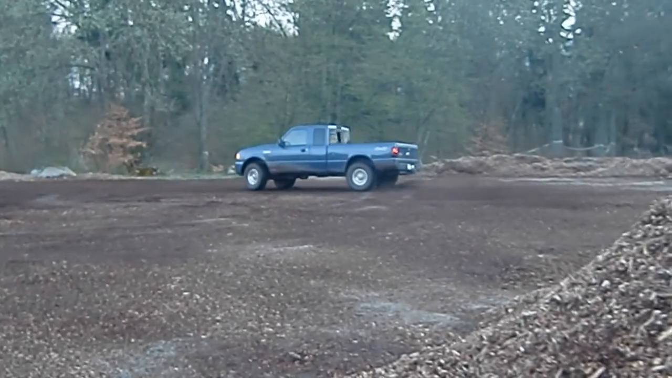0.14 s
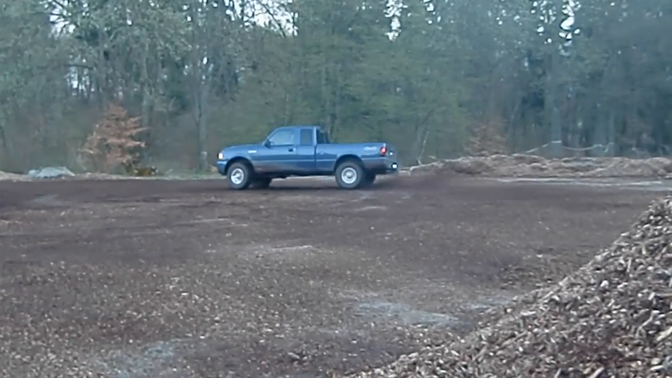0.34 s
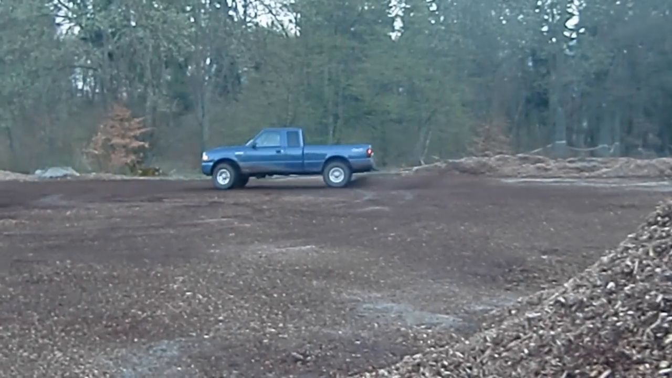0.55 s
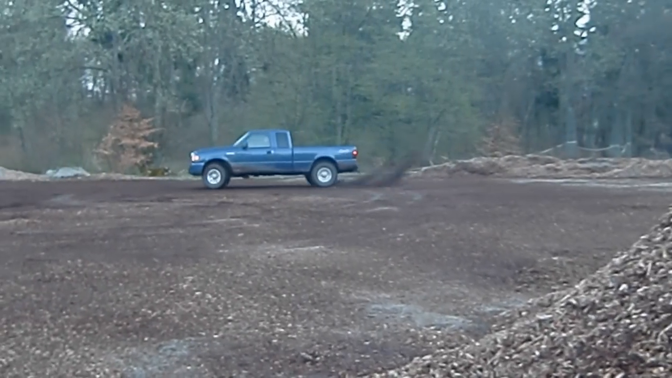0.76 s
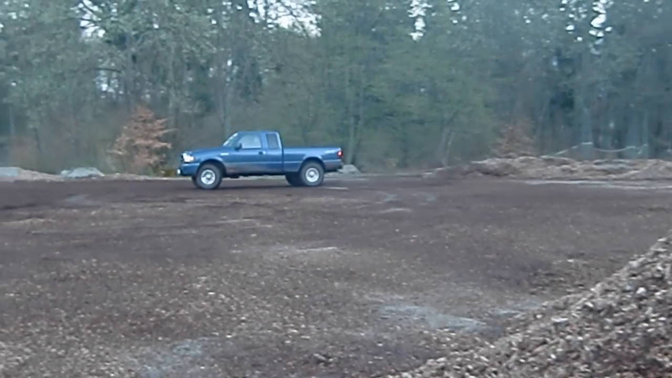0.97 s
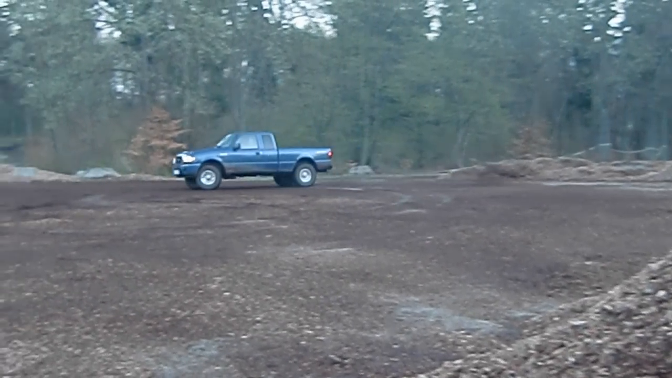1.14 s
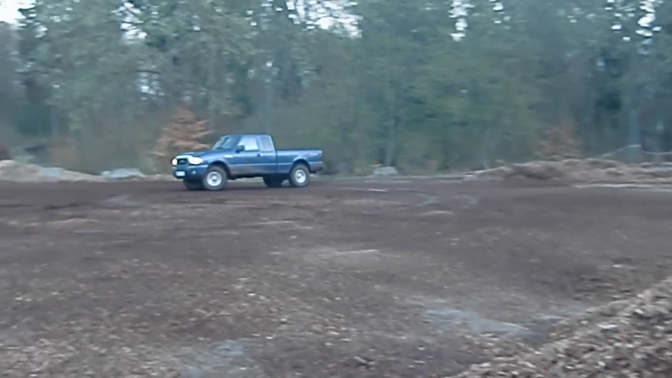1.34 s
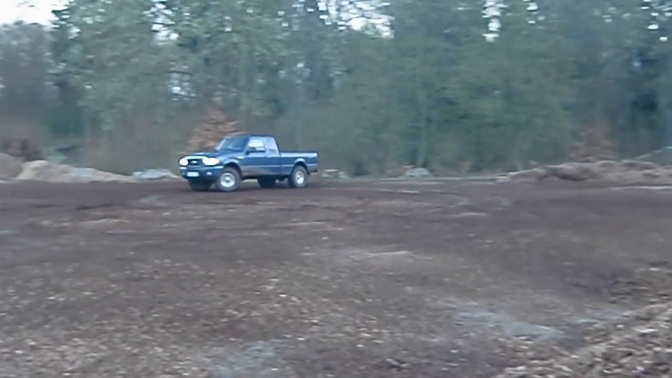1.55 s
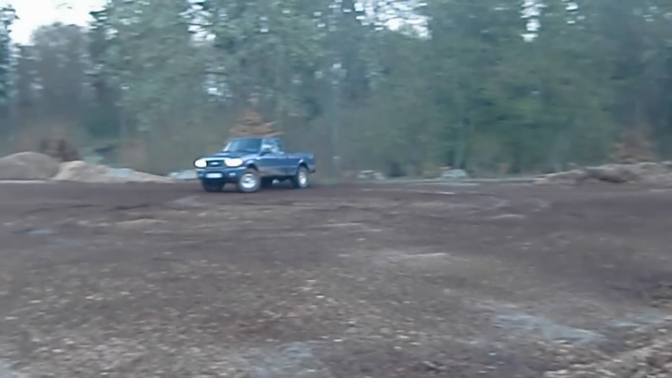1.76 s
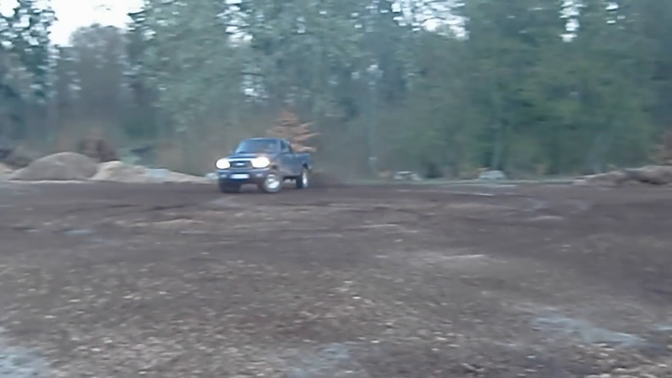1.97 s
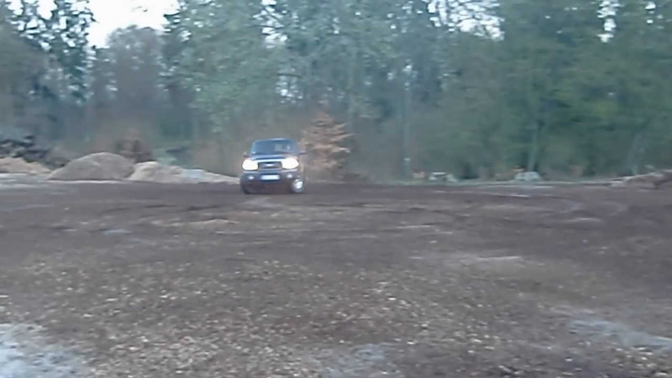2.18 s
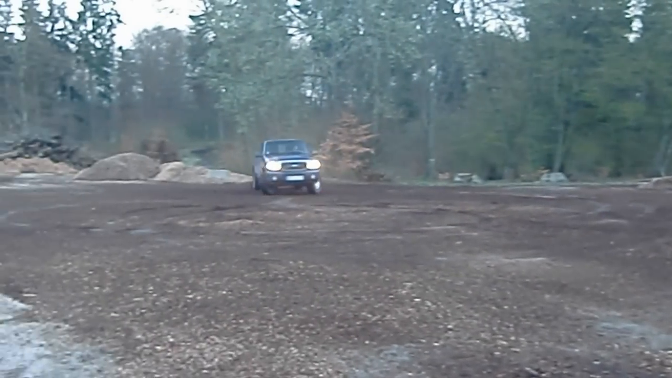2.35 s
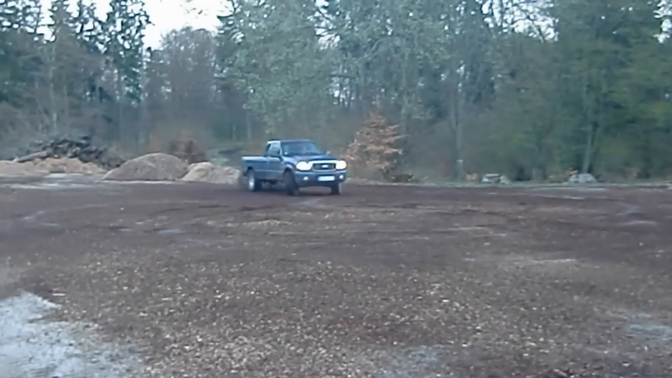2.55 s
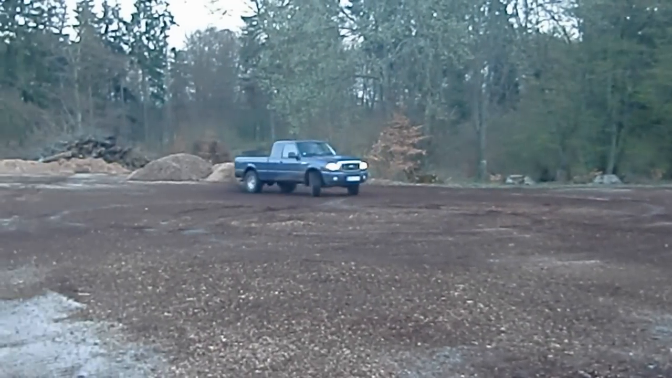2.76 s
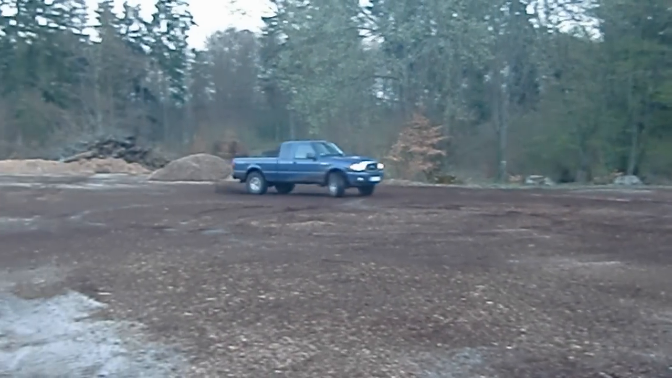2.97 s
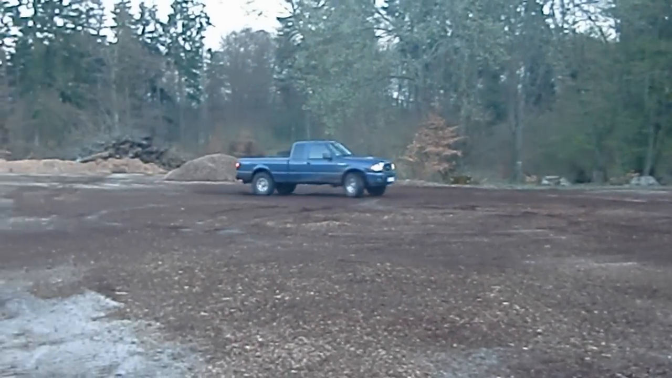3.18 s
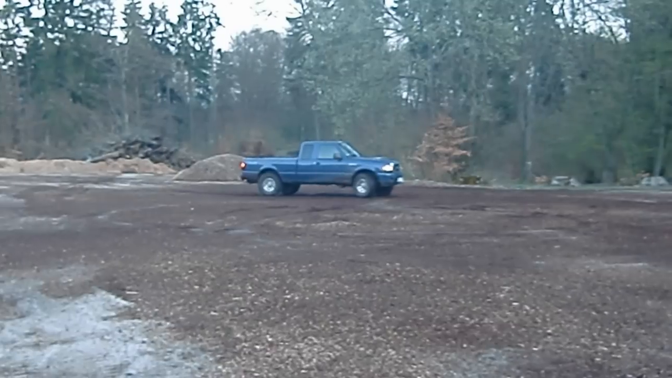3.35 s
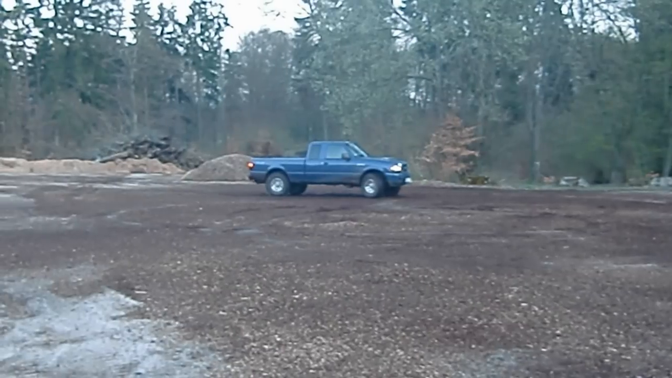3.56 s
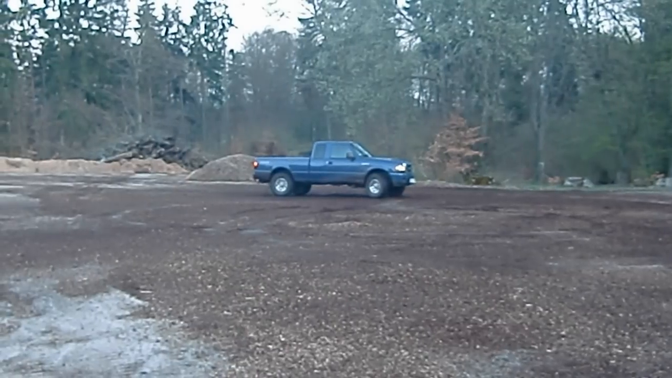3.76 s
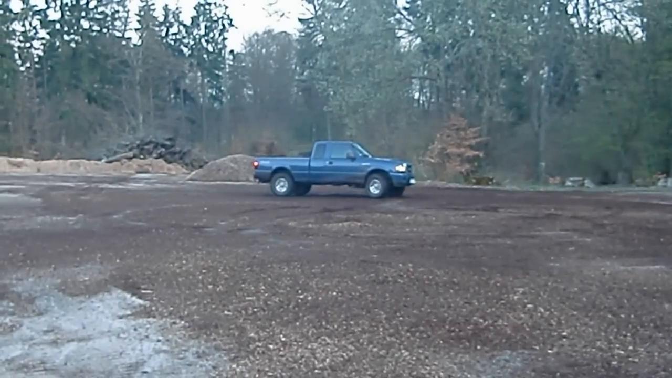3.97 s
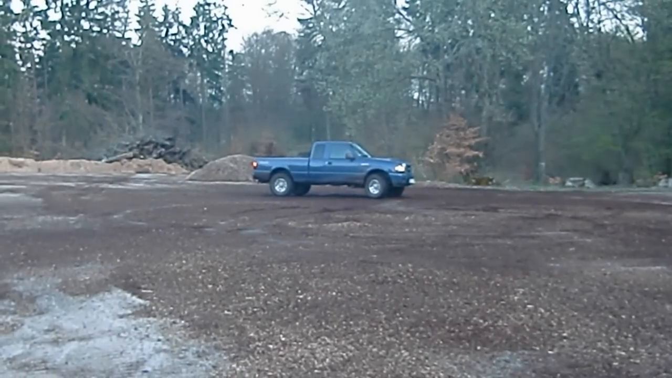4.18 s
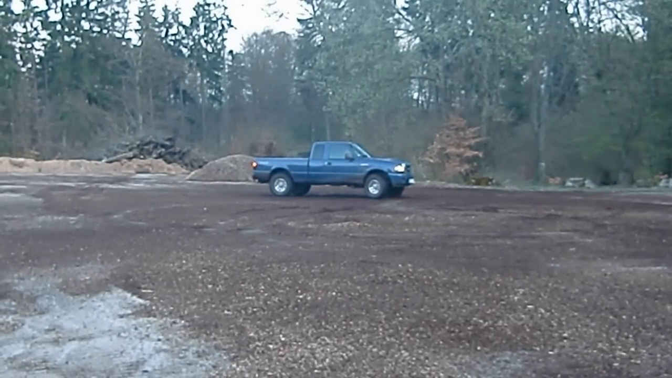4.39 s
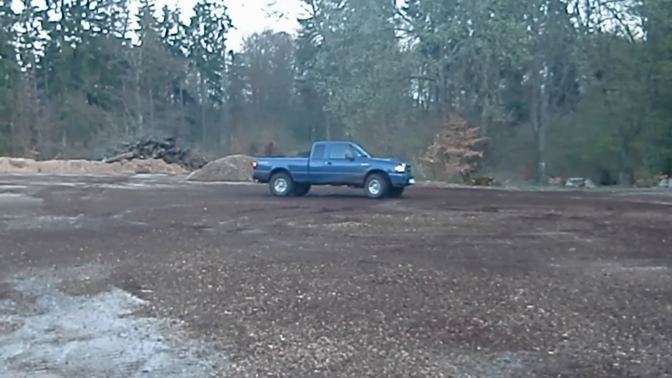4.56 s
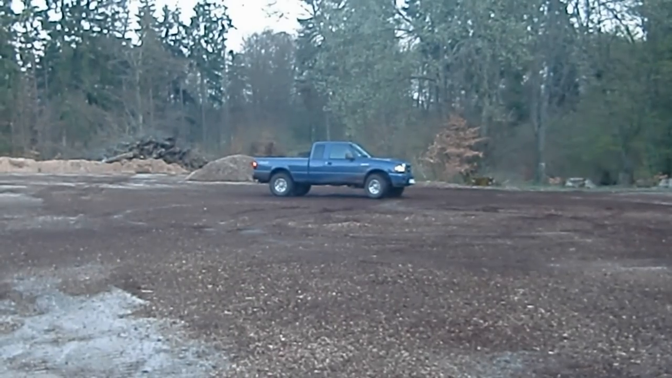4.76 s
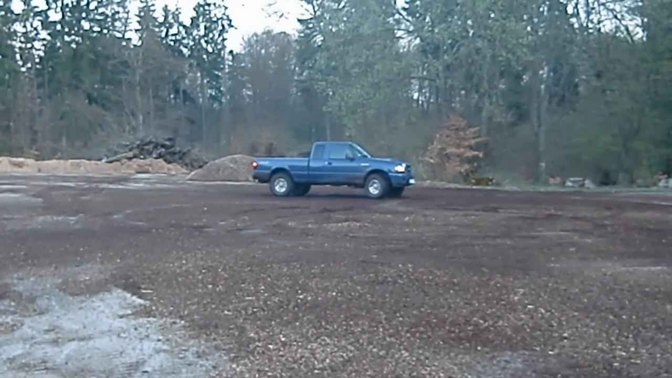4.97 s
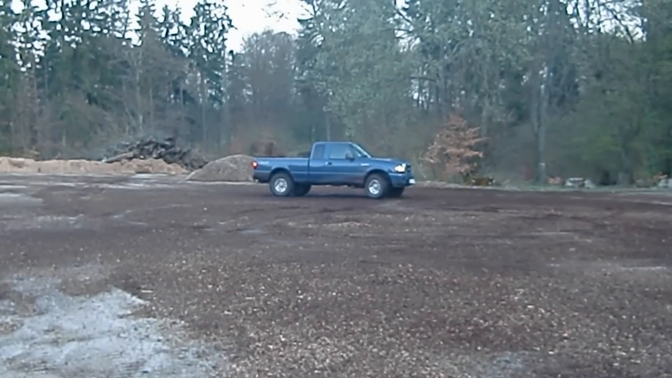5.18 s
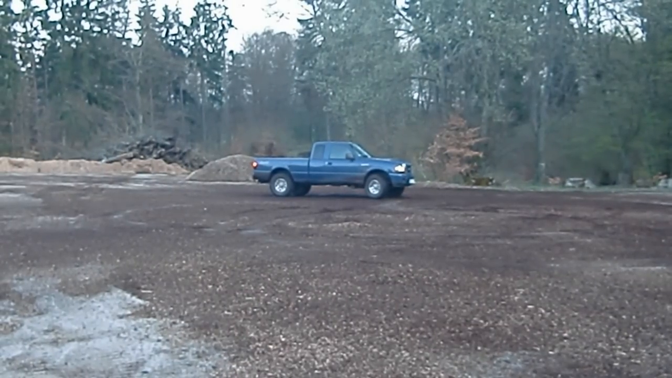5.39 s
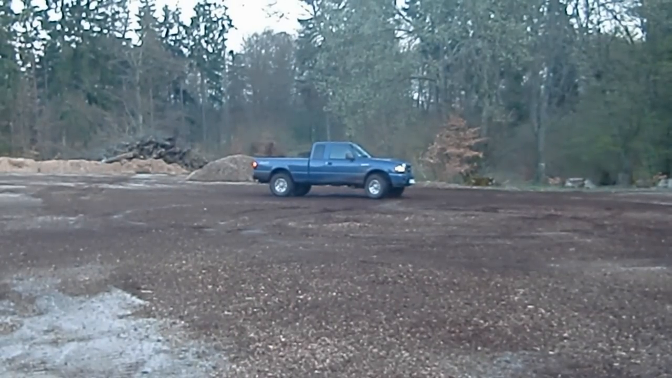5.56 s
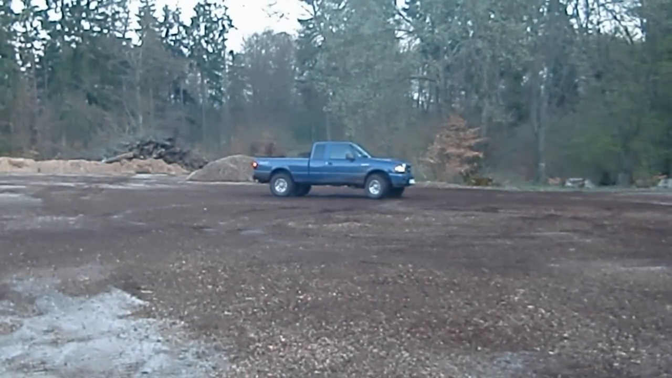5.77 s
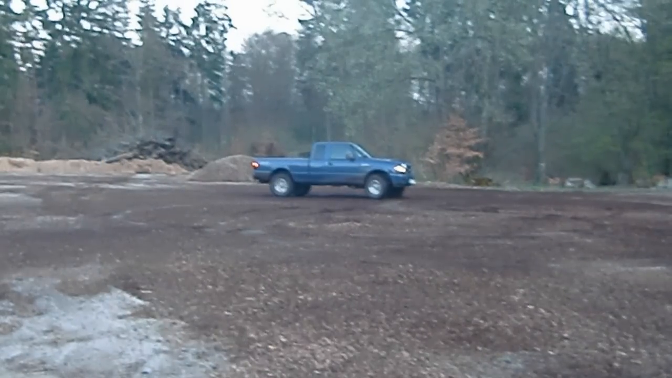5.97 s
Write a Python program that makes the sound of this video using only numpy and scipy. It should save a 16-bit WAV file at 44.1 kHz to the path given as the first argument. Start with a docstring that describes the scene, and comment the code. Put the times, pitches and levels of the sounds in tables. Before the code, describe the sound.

On an open dirt lot by a forest, a six-cylinder pickup revs in a wavering mid-low drone while spinning tyres churn, howl raggedly and throw hissing grit. The throttle shuts, the tyres moan and judder to a stop, and the driveline clunks. A faint low idle remains with small birds whistling. Heard from some distance, with echoes off the trees.

```python
"""An open lot of loose dirt edged by forest, with a six-cylinder pickup spinning some way from the microphone.
The engine revs as shaped noise churns and sprays like dirt under the wheels, with ragged tread howls.
The throttle shuts, ringing tyre modes judder to a stop and struck body modes clunk in the driveline.
Sines locked to the engine cycle then idle and pick up gently, while small birds whistle from the trees.
The wheel and driveline sounds return from the forest as echoes and a dull wash."""
import sys
import numpy as np
from scipy import signal
from scipy.io import wavfile
from scipy.ndimage import uniform_filter1d

SR = 44100
rng = np.random.default_rng(int(sys.argv[2]) if len(sys.argv) > 2 else 0)


def to_wav(sig):
    """Store sig (one row per channel, or 1-D mono) as 16-bit WAV at the path in sys.argv[1].

    Samples outside -1..1 are clipped; the rate is SR.
    """
    pcm = np.clip(np.atleast_2d(sig), -1, 1) * 32767
    pcm = np.round(pcm).astype(np.int16)
    wavfile.write(sys.argv[1], SR, pcm.T)  # frames by channels


N = 265902
TIME = np.arange(N) / SR

# All levels are relative: each source sets its own balance before the sounds meet at the microphone.

# outdoor air spectrum: pitch_hz, density_db
AIR_SPECTRUM = [(25, -5), (45, 0), (80, -9.5), (130, 4.5), (230, -4), (390, -12), (600, -8), (750, -9.5),
                (920, -16), (1500, -17.5), (2600, -22.5), (3400, -22), (5500, -27.5), (15500, -33)]
AIR_DB = -47

# bird whistles: start_s, length_s, start_pitch_hz, middle_pitch_hz, end_pitch_hz, trill_depth_hz, level_db
BIRD_WHISTLES = [(4.25, 0.16, 2710, 3160, 2700, 24, -57.5), (4.241, 0.31, 2010, 1903, 1750, 11, -55.5),
                 (4.659, .13, 3350, 3620, 3620, 200, -47.5), (4.76, 0.15, 4050, 4330, 4560, 100, -56.5),
                 (5.374, 0.13, 2980, 3130, 2700, 10, -55.5), (5.805, 0.081, 2660, 2520, 2330, 10, -55),
                 (5.897, 0.024, 3730, 3660, 3580, 20, -54), (5.96, 0.02, 3900, 3700, 3400, 20, -56)]
BIRD_TRILL_HZ = 86.5

# distinct echoes from the forest edge: delay_s, level_db
FOREST_ECHOES = [(.083, -14), (.17, -18), (.29, -26)]
FOREST_T60_S, FOREST_DB = 3.06, -21.5

# driveline clunks: start_s, knock_db, metal_click_db, boom_db
DRIVELINE_CLUNKS = [(3.688, -50, -45, -33), (3.693, -28, -28.5, -50), (3.703, -39, -46, -50),
                    (3.716, -40, -56, -27.5), (3.745, -38, -39, -35), (3.775, -55, -74, -43),
                    (3.998, -49, -41, -70), (4.300, -37, -67, -41), (4.316, -46, -65, -65),
                    (5.858, -59, -40, -55)]
# ringing of the knocked body: pitch_hz, level_db, t60_s
BODY_KNOCK_MODES = [(334, -3.5, 0.086), (422, -28, 0.035), (505, -3, 0.066), (570, 0, 0.067),
                    (670, -3.5, 0.12), (980, -17, 0.055)]
# low booming of the body: pitch_hz, level_db, t60_s
BODY_BOOM_MODES = [(230, -2, 0.085), (170.5, -20, 0.28)]

# tyres catch and let go in the skid: start_s, level_db
TYRE_CATCHES = [(2.868, -11), (2.897, -6), (2.917, -5), (2.944, -10), (2.959, -8), (2.998, -10),
                (3.017, -9), (3.048, -14), (3.073, -11.5), (3.120, -14.5), (3.207, -17)]
# tyre ring: pitch_hz, level_db, t60_s
TYRE_RING_MODES = [(624, 4.5, 0.043), (678, -15, 0.047), (570, -35, 0.012)]
# clods thrown against the body: start_s, level_db
CLOD_HITS = [(.349, 2), (.432, -8), (.74, 7.5), (.77, 3), (1.971, 12), (1.986, -2), (2.004, 4), (2.010, 6),
             (2.022, -22)]

# rough howls of the slipping tread: start_s, length_s, start_pitch_hz, end_pitch_hz, level_db
TREAD_HOWLS = [(0.0, 0.062, 607, 586, -14), (0.227, 0.076, 594.5, 586, -9), (0.463, 0.07, 650, 640, -17),
               (0.714, 0.184, 625, 681, -19), (.97, 0.19, 584, 615, -15), (1.191, 0.27, 705, 738, -19),
               (1.479, 0.22, 566, 603, -19), (1.817, 0.19, 740, 790, -15.5),
               (1.956, 0.096, 970, 1028, -13.5), (2.041, 0.14, 993, 1025, -23),
               (2.194, 0.15, 1146, 1121, -16.5), (2.44, 0.11, 1500, 1570, -19),
               (2.522, 0.16, 571.4, 607, -15)]

# the throttle shuts and spinning turns to sliding: from_s, to_s
SPIN_TO_SLIDE = [2.55, 2.71]
# roar of the spinning tyres: pitch_hz, density_db
SPIN_DRONE_SPECTRUM = [(330, -22), (420, -14.5), (530, -2), (610, 1), (720, 0), (850, -22), (1050, -7.5)]
# moan of the sliding tyres: pitch_hz, density_db
SLIDE_MOAN_SPECTRUM = [(380, -23.5), (480, -11.5), (540, -12), (630, -1), (740, -8), (860, -29),
                       (1050, -31)]
# dirt churned by the spinning tread: pitch_hz, density_db
SPIN_CHURN_SPECTRUM = [(350, -15), (600, -4), (850, 2.5), (1150, -1), (1500, -3), (1850, -9), (2200, -18.5),
                       (2700, -17), (3500, -32)]
# dirt scraped by the sliding tread: pitch_hz, density_db
SLIDE_SCRAPE_SPECTRUM = [(300, -4), (600, 5.5), (900, 0.5), (1200, 4), (1700, -2), (2100, -3),
                         (2500, -12.5), (3300, -21)]
# flying grit: pitch_hz, density_db
GRIT_SPECTRUM = [(1650, -1), (2800, -4), (3100, 5), (3890, 0.5), (5000, -3.5), (5370, -4), (5850, -9),
                 (6800, -7), (7910, -16.5), (8930, -15), (10500, -18), (12800, -22.5), (15500, -27)]
# chassis rumble: pitch_hz, density_db
RUMBLE_SPECTRUM = [(40, -32), (62, -10), (85, -5), (130, 1.5), (220, 6), (340, 0.5), (450, -0.5),
                   (700, -31)]
# drone of the tyres: time_s, level_db
DRONE_LEVEL = [(0.35, -21), (1.25, -16), (1.97, -21), (2.28, -25.5), (2.63, -15), (2.8, -17.5),
               (2.91, -13.5), (3.28, -26.5), (3.65, -51)]
# churning of the dirt under the tread: time_s, level_db
CHURN_LEVEL = [(0.0, -23.5), (0.67, -27), (1.41, -19), (2.09, -19), (2.55, -24), (3.4, -37.5), (3.65, -53)]
# flying grit, before the extra throws: time_s, level_db
GRIT_LEVEL = [(2.95, -37.5), (3.134, -43), (3.362, -41), (3.65, -69)]
# fine grit, lost first as the truck slows: time_s, treble_gain_db
FINE_GRIT_GAIN = [(0, 3), (.35, 3), (.6, 0.5), (1.7, 5.5), (2.6, 2.5), (3.14, 4.5), (3.3, -5), (3.6, -10)]
# the wheels bite and throw extra grit: start_s, length_s, gain_db
GRIT_THROWS = [(-.04, 0.57, 2), (1.043, .19, 3), (1.34, .56, 2.5), (2.393, 0.24, 9.5), (2.677, 0.19, 4)]
THROW_EDGE_S = 0.053
SPRAY_HZ = 5230  # parts coarse grit from fine
THROW_BRIGHTENS = 0.1  # share of a throw's gain added again to the fine grit
# the chassis rumbles under the churning, more so in the tightest part of the turn
RUMBLE_DB, TURN_DB, TURN_S, TURN_LENGTH_S = -13, 15, 2.44, 0.11

# firing rate while revving: time_s, rate_hz
REV_FIRING = [(0.0, 146.4), (0.42, 169.0), (0.6, 168.2), (0.78, 162.6), (0.88, 151.3), (1.01, 152.0),
              (1.51, 170.8), (1.72, 165.4), (2.08, 172.3), (2.51, 189.4), (2.56, 189.5), (2.76, 151.7)]
# firing rate as the engine runs down, nearly stalls and idles: time_s, rate_hz
IDLE_FIRING = [(2.85, 60.0), (2.95, 51.8), (3.07, 37.8), (3.2, 48.9), (3.28, 52.3), (3.53, 44.5),
               (4.49, 38.0), (4.89, 49.0), (5.2, 52.8), (5.5, 51.5), (6.03, 46.5)]
# the engine loses its load: from_s, to_s
LOAD_FALL = [2.73, 2.79]
# firing tone under load: time_s, level_db
FIRING_LEVEL = [(0.0, -22.5), (0.23, -18), (0.47, -23), (0.51, -20.5), (0.71, -23), (0.76, -14),
                (0.93, -27.5), (0.98, -23), (1.14, -26), (1.26, -17), (1.38, -23.5), (1.54, -18),
                (1.62, -29), (1.71, -20), (1.84, -27.5), (2.23, -17.5), (2.67, -15.5), (2.72, -19.5)]
# octave of the firing tone on its way into the pipe: time_s, level_db
OCTAVE_LEVEL = [(0, -21), (.17, -22), (.34, -24), (.58, -17), (.86, -33), (1.2, -22), (1.33, -29),
                (2.0, -21.5), (2.3, -17.5), (2.7, -27)]
# further exhaust lines under load, uneven-cylinder lines and higher firing harmonics:
# multiple of the four-stroke cycle, level_db (against the firing tone)
LOADED_LINES = [(3, -26), (5, -27), (7, -24.5), (8, -24), (9, -15.5), (10, -29), (11, -20.5), (14, -45),
                (15, -24), (18, -18), (22, -14), (24, -11.5)]
# the idle dies back, then picks up: time_s, firing_throb_db, pipe_boom_db
IDLE_LEVELS = [(2.92, -45, -31.5), (3.1, -61, -39), (3.33, -46, -47.5), (3.6, -51, -55), (4.55, -52, -48),
               (4.85, -46, -46), (5.1, -50, -36), (5.24, -47, -46.5), (5.42, -48, -38.5), (5.68, -45, -34),
               (5.85, -42, -42.5), (6.0, -43, -39)]
# exhaust lines at idle, ahead of the pipe: multiple of the four-stroke cycle, level_db (against the boom)
IDLE_OVERTONES = [(18, 1.5), (21, -3.5), (24, -8.5), (33, -18), (36, -27)]
# resonances humming in the exhaust pipe: pitch_hz, width_hz, level_db
PIPE_HUM = [(150.9, 13, -50), (291, 30, -53.5)]
# bands that the pipe lets through best: pitch_hz, width_hz
PIPE_PASSBANDS = [(155, 25), (312, 26.2)]
PIPE_LEAK_DB = -16
# the engine shakes twice per turn, hardest when it is dragged down at this rate or faster
SHAKE_DB, LUG_DB, LUG_HZ_PER_S = -50.5, -35.5, 92
# a sagging idle shudders at twice the firing rate, fully when it falls this fast
SHUDDER_DB, SHUDDER_HZ_PER_S = -51, 26

NOTCH_HZ, CUTOFF_HZ = 2750, 15700


def from_db(db):
    """Decibels to gain."""
    return np.exp(np.asarray(db) * np.log(10) / 20)


def rms_one(x):
    """Scale to unit power."""
    return x / np.sqrt(np.mean(x ** 2) + 1e-20)


def in_time(rows):
    """Each column of a curve, at every sample."""
    s, *columns = np.transpose(rows)
    return [np.interp(TIME, s, column) for column in columns]


def delayed(x, seconds):
    """The same sound, later."""
    return np.interp(TIME - seconds, TIME, x, left=0)


def drift(rate_hz):
    """Slow chance with a spread of one: smoothed noise, drawn at every 40th sample."""
    r = np.exp(-2 * np.pi * rate_hz * 40 / SR)
    noise = rng.standard_normal(N // 40 + 2002)
    slow = signal.lfilter([1], [1, -2 * r, r * r], noise)[2000:]  # settled part only
    return np.interp(np.arange(N) / 40, np.arange(len(slow)), rms_one(slow))


def band(x, low_hz, high_hz, order=2):
    """Butterworth band-pass."""
    edges_hz = [low_hz, min(high_hz, .48 * SR)]
    sos = signal.butter(order, edges_hz, "band", fs=SR, output="sos")
    return signal.sosfilt(sos, x + 1e-18)


def strikes(rows, column=1):
    """One click per row, as strong as the given column."""
    clicks = np.zeros(N)
    for row in rows:
        clicks[int(row[0] * SR)] += from_db(row[column])
    return clicks


def ring(clicks, modes):
    """Clicks set decaying sines ringing."""
    out = 0
    for pitch_hz, level_db, t60_s in modes:
        r = from_db(-60 / (t60_s * SR))
        w = 2 * np.pi * pitch_hz / SR
        mode = signal.lfilter([0, np.sin(w)], [1, -2 * r * np.cos(w), r * r], clicks + 1e-18)
        out = out + from_db(level_db) * mode
    return out


def bursts(clicks, t60_s):
    """Each click becomes a dying puff of noise."""
    r = from_db(-60 / (t60_s * SR))
    envelope = signal.lfilter([1], [1, -r], clicks + 1e-18)
    return envelope * rng.standard_normal(N)


def grains(per_s, spread_db):
    """Two unrelated streams of tiny impacts of uneven size."""
    sizes = from_db(spread_db * np.minimum(rng.exponential(1, (2, N)), 4))
    signs = rng.choice([-1, 1], (2, N))
    hits = rng.random((2, N)) < per_s / SR
    return sizes * signs * hits


def coloured(streams, spectrum, patchy_db):
    """Third-octave bands, fed in turn by two streams, each flickering on its own; unit power."""
    hz, db = np.transpose(spectrum)
    edges_hz = 20 * 2 ** (np.arange(31) / 3)
    out = 0
    for k, (low, high) in enumerate(zip(edges_hz, edges_hz[1:])):
        if high > hz[0] and low < hz[-1]:
            level_db = np.interp(np.log(low * high) / 2, np.log(hz), db)
            flicker_db = patchy_db * drift(12.0)
            out = out + band(streams[k % 2], low, high, order=3) * from_db(level_db + flicker_db)
    return rms_one(out)


def outdoor_air():
    """Faint, gently flickering noise shaped to the air of the open lot."""
    return from_db(AIR_DB) * coloured(rng.standard_normal((2, N)), AIR_SPECTRUM, patchy_db=1.2)


def birds(warble=0.0051):
    """Arched whistles with a fast trill of varied depth, smeared by the trees."""
    out = np.zeros(N)
    unsteady = 1 + warble * drift(84)
    trill = np.sin(2 * np.pi * BIRD_TRILL_HZ * TIME + 0.69 * drift(24))
    for start, length, first_hz, middle_hz, last_hz, trill_hz, level_db in BIRD_WHISTLES:
        along = np.clip((TIME - start) / length, 0, 1)
        arch = np.polyfit([0, .5, 1], [first_hz, middle_hz, last_hz], 2)
        pitch_hz = (np.polyval(arch, along) + trill_hz * trill) * unsteady
        swell = 2 * np.sqrt(along * (1 - along))
        whistle = np.sin(2 * np.pi * np.cumsum(pitch_hz) / SR)
        out += from_db(level_db - 3.5) * swell * whistle
    lags_s = rng.uniform(0.004, 0.096, size=8)
    return out + sum(from_db(-12.0 - 60 * lag) * delayed(out, lag) for lag in lags_s)


def forest(x):
    """A few echoes off the tree line, then a dull wash scattered among the trunks."""
    echoes = sum(from_db(db) * delayed(x, lag) for lag, db in FOREST_ECHOES)
    age_s = TIME[:2 * SR]
    build_up = 1 - np.exp(-age_s / 0.14)
    scatter = rng.standard_normal(len(age_s)) * from_db(-60 * age_s / FOREST_T60_S) * build_up
    wash = signal.fftconvolve(x, scatter / np.sqrt(np.sum(scatter ** 2)))[:N]
    return band(echoes, 90, 2300, order=1) + from_db(FOREST_DB) * band(wash, 630, 2800)


def driveline():
    """Slack is taken up with a click and a knock, and the body booms."""
    knock = ring(strikes(DRIVELINE_CLUNKS, column=1), BODY_KNOCK_MODES)
    click = bursts(strikes(DRIVELINE_CLUNKS, column=2), t60_s=0.045)
    boom = ring(strikes(DRIVELINE_CLUNKS, column=3), BODY_BOOM_MODES)
    out = from_db(-0.5) * band(knock, 226, 1070)
    out += from_db(-2) * band(click, 1300, 5100)
    return out + from_db(6.5) * band(boom, 100, 420, order=1)


def skid():
    """The soft tyres swell into a short ring each time they catch; clods burst on the body."""
    judder = from_db(0.5) * band(ring(strikes(TYRE_CATCHES), TYRE_RING_MODES), 584, 670)
    clods = band(bursts(strikes(CLOD_HITS), t60_s=0.055), 734, 1060)
    return judder + clods


def howls(rough=0.03283, flutter_db=3.5):
    """Stick and slip under the tread: a ragged tone that swells and dies with each spell."""
    out = np.zeros(N)
    unsteady = 1 + rough * drift(65.8)
    for start, length, first_hz, last_hz, level_db in TREAD_HOWLS:
        along = np.clip((TIME - start) / length, 0, 1)
        pitch_hz = (first_hz + (last_hz - first_hz) * along) * unsteady
        swell = np.sin(np.pi * along)
        out += from_db(level_db) * swell * np.sin(2 * np.pi * np.cumsum(pitch_hz) / SR)
    return out * from_db(flutter_db * drift(53))


def throws_db():
    """Each throw of grit rises, holds and falls."""
    gain_db = 0
    for start, length, db in GRIT_THROWS:
        from_edge_s = np.minimum(TIME - start, start + length - TIME)
        gain_db = gain_db + db * np.clip(from_edge_s / THROW_EDGE_S, 0, 1)
    return gain_db


def flying_grit(surge):
    """Many small hard impacts, swelling with each throw; the fine spray has its own level."""
    level_db, = in_time(GRIT_LEVEL)
    fine_db, = in_time(FINE_GRIT_GAIN)
    thrown_db = throws_db()
    grit = coloured(grains(11000, 2.5), GRIT_SPECTRUM, patchy_db=1.1)
    grit *= from_db(level_db + thrown_db + 0.37 * surge)
    coarse = signal.sosfiltfilt(signal.butter(2, SPRAY_HZ, fs=SR, output="sos"), grit)
    return coarse + from_db(fine_db + THROW_BRIGHTENS * thrown_db) * (grit - coarse)


def wheels():
    """Dirt drums on the tyres, is churned under the tread and flies off as grit, all in uneven surges."""
    drone_db, = in_time(DRONE_LEVEL)
    churn_db, = in_time(CHURN_LEVEL)
    surge = drift(36)
    # spinning tyres roar broadly; sliding ones moan on their own resonance and scrape
    spin = np.interp(TIME, SPIN_TO_SLIDE, [1, 0])
    spinning, sliding = np.sqrt(spin), np.sqrt(1 - spin)

    lumps, crumbs = grains(2800, 1.53), grains(4000, 2.8)
    drone = spinning * from_db(-0.35) * coloured(lumps, SPIN_DRONE_SPECTRUM, patchy_db=2.8)
    drone += sliding * from_db(-7.5) * coloured(lumps, SLIDE_MOAN_SPECTRUM, patchy_db=1.0)
    drone *= from_db(drone_db + 1.96 * surge)
    churn = spinning * from_db(1.9) * coloured(crumbs, SPIN_CHURN_SPECTRUM, patchy_db=1.7)
    churn += sliding * from_db(0.04) * coloured(crumbs, SLIDE_SCRAPE_SPECTRUM, patchy_db=1.0)
    churn *= from_db(churn_db + 0.97 * surge)

    turn = np.exp(-((TIME - TURN_S) / TURN_LENGTH_S) ** 2)
    rumble = coloured(grains(2000, 1.8), RUMBLE_SPECTRUM, patchy_db=5.0)
    rumble *= spinning + from_db(9) * sliding * (1 - turn)
    rumble *= from_db(churn_db + RUMBLE_DB + TURN_DB * turn)
    rolling = np.interp(TIME, [3.5, 3.72], [1, 0])
    return rolling * (drone + churn + flying_grit(surge) + rumble)


def pipe_gain(hz):
    """How well the exhaust pipe passes a tone: resonant peaks above a constant leak."""
    peaks = sum(1 / (1 + (2 * (hz - centre) / width) ** 2) for centre, width in PIPE_PASSBANDS)
    return from_db(PIPE_LEAK_DB) + peaks


def pipe_hum():
    """Unsteady gas flow keeps the pipe's own resonances humming."""
    out = 0
    for hz, width, level_db in PIPE_HUM:
        flow = band(rng.standard_normal(N), hz - width / 2, hz + width / 2)
        out = out + from_db(level_db) * rms_one(flow)
    return out


def sagging(firing_hz, full_hz_per_s):
    """How hard the engine is being dragged down, from 0 to 1."""
    fall_hz_per_s = uniform_filter1d(-np.gradient(firing_hz) * SR, size=4000)
    return np.clip(fall_hz_per_s / full_hz_per_s, 0, 1)


def idling(cycle, firing_hz, flutter_db=1.3, smear=0.16):
    """Slow firings throb; each overtone booms as it passes through a resonance of the pipe."""
    throb_db, boom_db = in_time(IDLE_LEVELS)
    firing = 6 * cycle
    out = from_db(throb_db) * np.sin(firing + 0.26 * drift(5.3))
    shudder = from_db(SHUDDER_DB) * sagging(firing_hz, SHUDDER_HZ_PER_S)
    out += shudder * np.sin(2 * firing + 0.47 * drift(8))
    for multiple, line_db in IDLE_OVERTONES:
        level = from_db(boom_db + line_db + flutter_db * drift(11))
        level *= pipe_gain(multiple * firing_hz / 6)
        out += level * np.sin(multiple * cycle + smear * drift(4.2))
    return out


def revving(cycle, firing_hz, flutter_db=1.15, uneven_db=2.5, smear=0.92):
    """Six firings per cycle make the main tone; uneven cylinders and higher harmonics add lines, lugging a shake."""
    firing_db, = in_time(FIRING_LEVEL)
    octave_db, = in_time(OCTAVE_LEVEL)
    firing = 6 * cycle
    out = from_db(firing_db + flutter_db * drift(6.1)) * np.sin(firing)
    octave = from_db(octave_db + 0.99 * drift(15)) * pipe_gain(2 * firing_hz)
    out += octave * np.sin(2 * firing + 0.49 * drift(19))
    shake = from_db(SHAKE_DB) + from_db(LUG_DB) * sagging(firing_hz, LUG_HZ_PER_S)
    out += shake * np.sin(4 * cycle + .5 * drift(8.6))  # one cycle is two turns
    for multiple, line_db in LOADED_LINES:
        level = from_db(firing_db + line_db + uneven_db * drift(2.1))
        out += level * np.sin(multiple * cycle + smear * drift(6.2))
    return out


def exhaust(waver=.002):
    """The engine's firing cycle drives tones that rev under load, then drop to idle, over the pipe's hum."""
    firing_hz, = in_time(np.vstack([REV_FIRING, IDLE_FIRING]))
    cycle_hz = firing_hz / 6 * (1 + waver * drift(22.0))  # six cylinders fire per cycle
    cycle = 2 * np.pi * np.cumsum(cycle_hz) / SR
    load = np.interp(TIME, LOAD_FALL, [1, 0])
    idle = np.interp(TIME, [2.8, 2.9], [0, 1])
    tones = load * revving(cycle, firing_hz) + idle * idling(cycle, firing_hz)
    return np.sqrt(2) * tones + pipe_hum()


def scene():
    """The outdoor air, the birds, and the truck with its wheels and driveline echoing from the forest."""
    rough = wheels() + howls() + skid() + driveline()
    truck = rough + forest(rough) + exhaust()
    # the ground reflection weakens one narrow band of the truck's sound
    notched = signal.lfilter(*signal.iirnotch(NOTCH_HZ, 9, fs=SR), truck)
    truck = notched * 0.79 + truck * 0.17
    return (truck + outdoor_air() + birds())[None]


def record(dry):
    """A very short fade-in avoids a click at the start; peaks are rounded and the top is cut."""
    fade_in = np.minimum(TIME / .003, 1)
    rounded = fade_in * .95 * np.tanh(dry / .95)
    top_cut = signal.ellip(12, .1, 80, CUTOFF_HZ, fs=SR, output="sos")
    return signal.sosfilt(top_cut, rounded)


dry = scene()
out = record(dry)
to_wav(out)
```